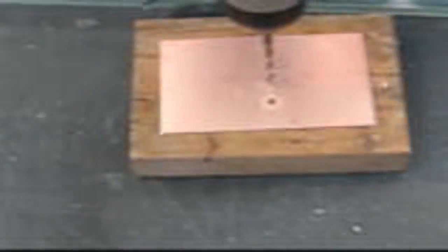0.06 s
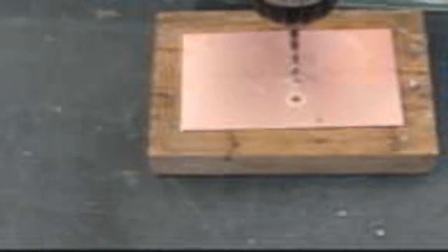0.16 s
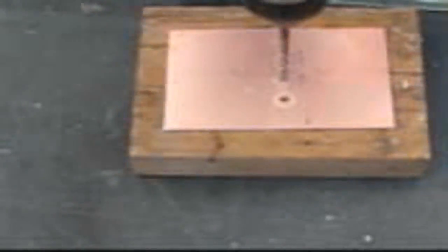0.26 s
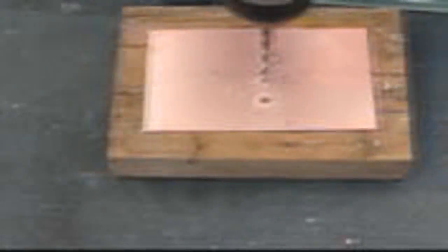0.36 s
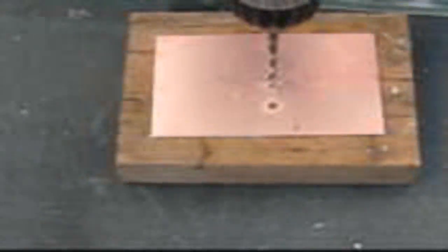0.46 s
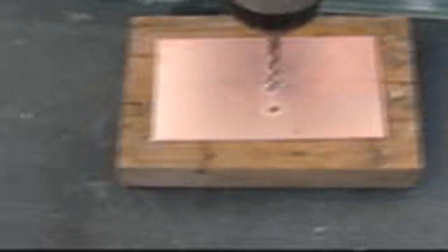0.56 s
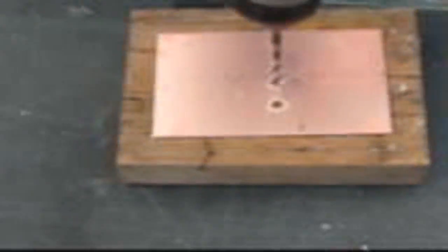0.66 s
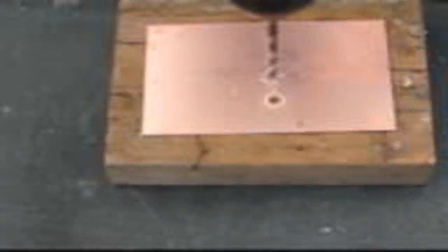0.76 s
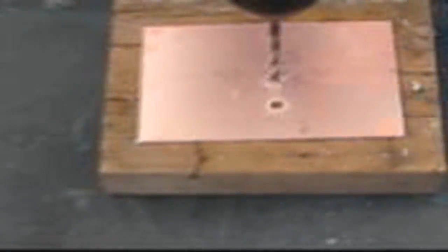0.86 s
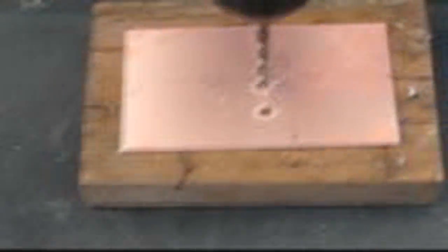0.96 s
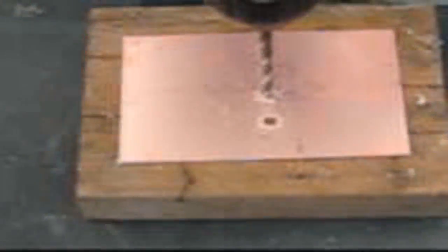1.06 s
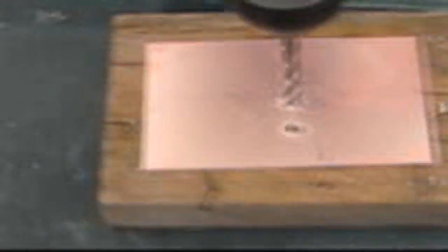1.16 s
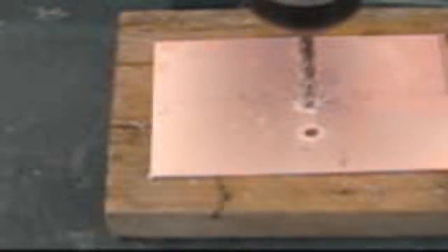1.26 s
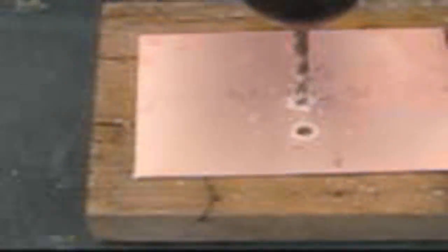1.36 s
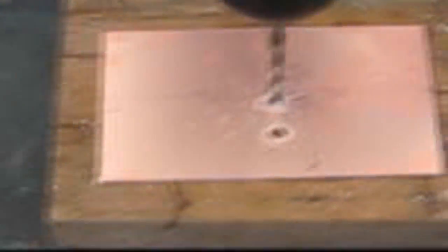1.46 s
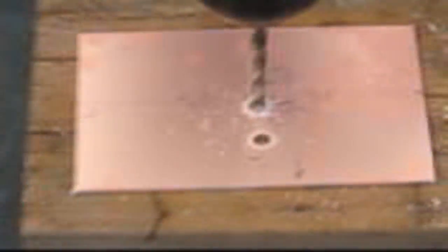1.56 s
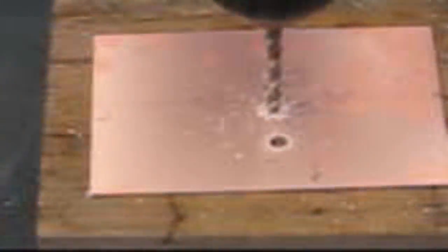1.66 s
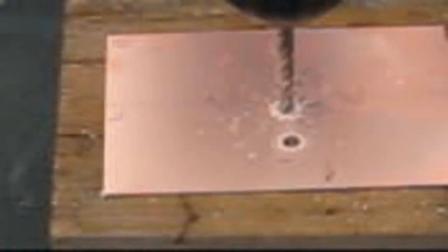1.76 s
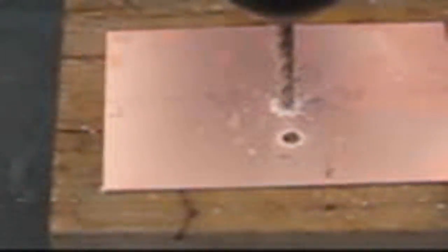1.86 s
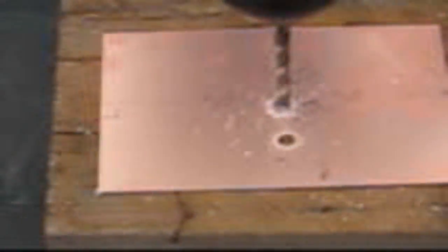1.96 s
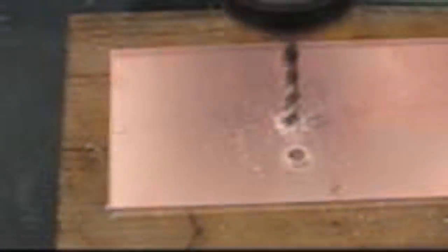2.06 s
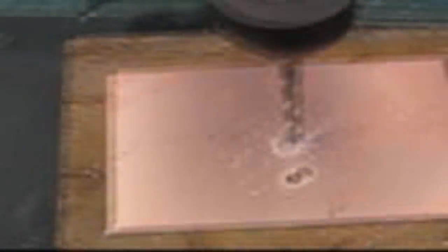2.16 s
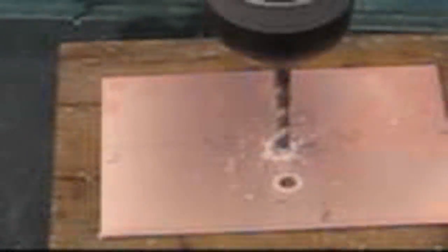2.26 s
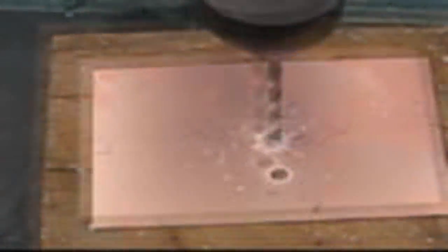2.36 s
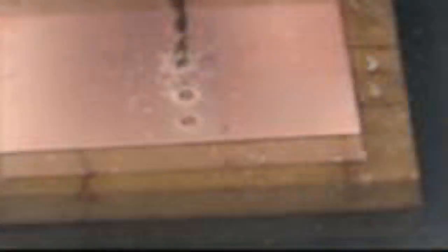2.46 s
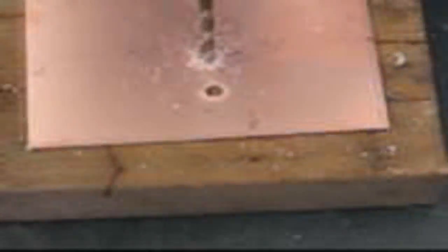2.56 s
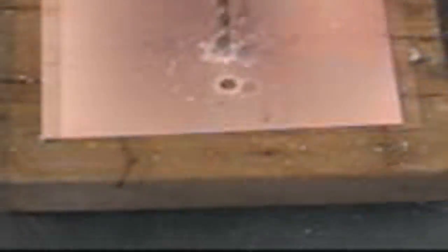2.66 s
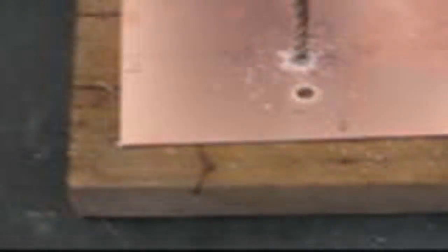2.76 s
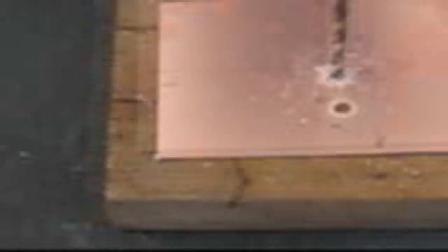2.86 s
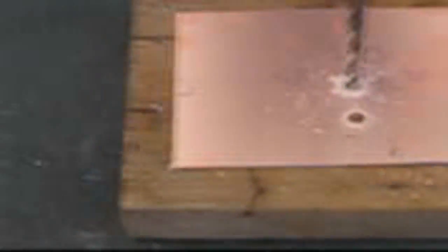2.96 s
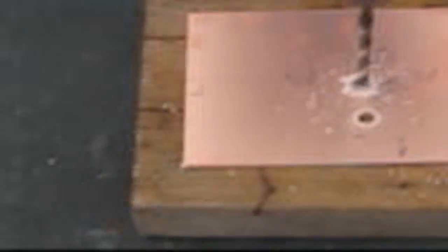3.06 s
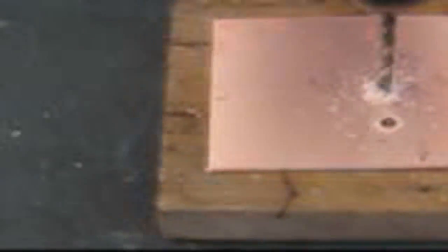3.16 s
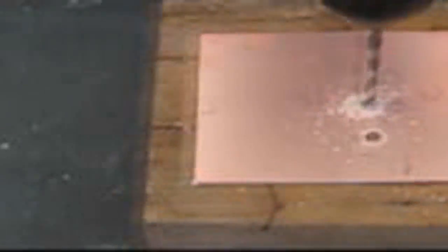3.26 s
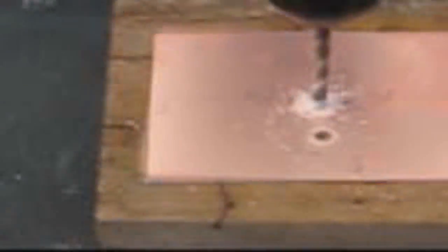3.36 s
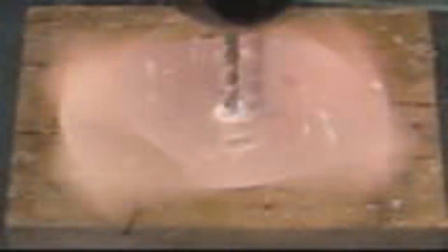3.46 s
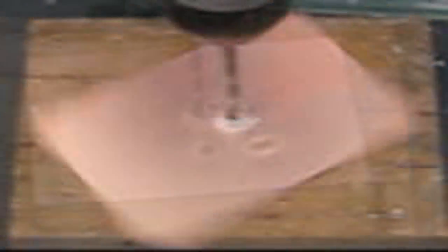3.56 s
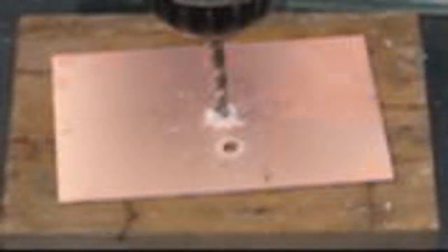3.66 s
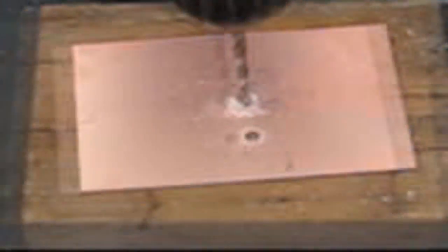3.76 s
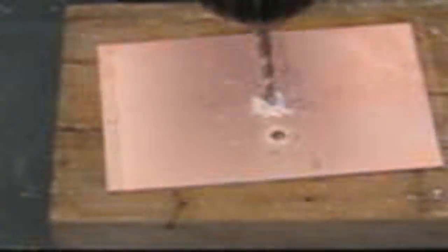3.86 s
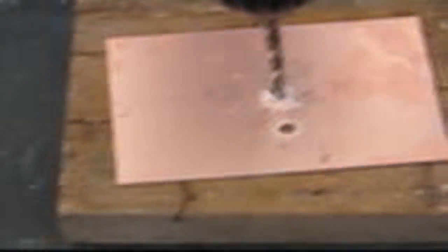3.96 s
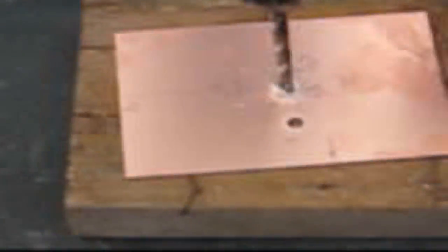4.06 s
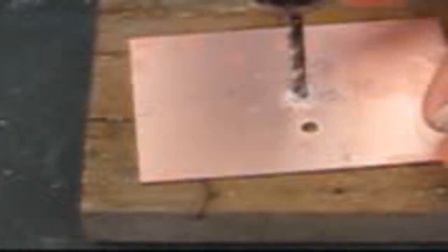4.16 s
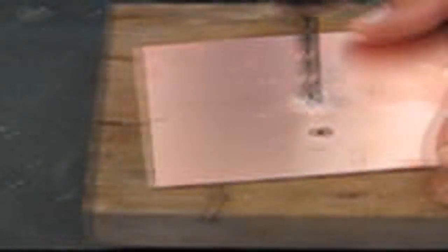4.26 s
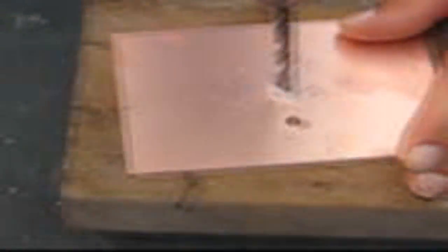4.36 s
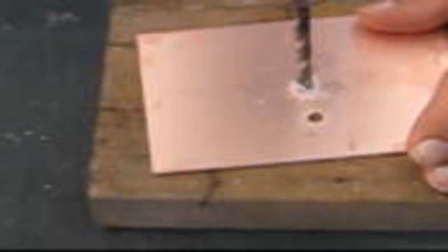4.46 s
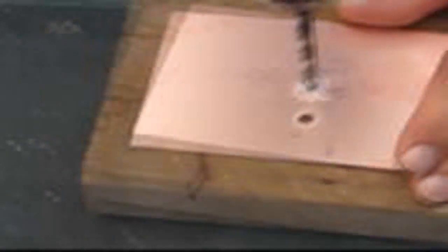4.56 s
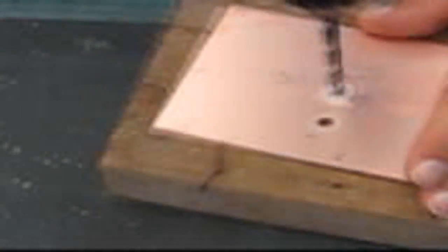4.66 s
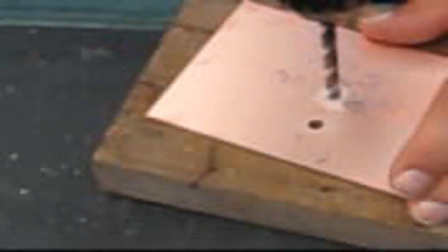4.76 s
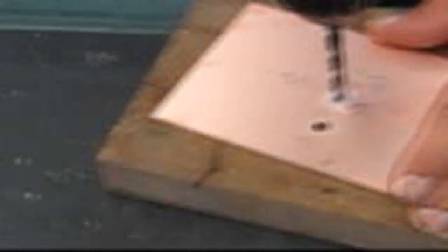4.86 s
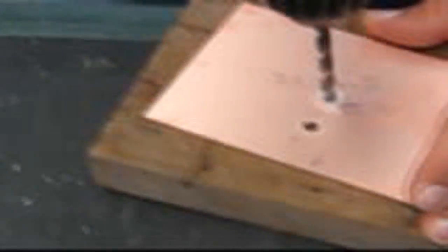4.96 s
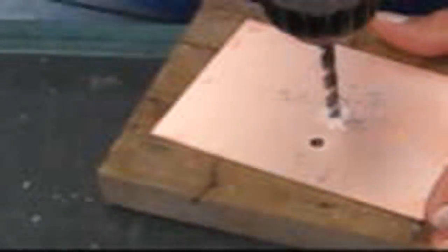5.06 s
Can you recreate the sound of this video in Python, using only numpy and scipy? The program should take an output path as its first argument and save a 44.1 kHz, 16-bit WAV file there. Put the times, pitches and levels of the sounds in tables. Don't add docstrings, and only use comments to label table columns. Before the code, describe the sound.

A handheld electric drill is heard very close, with little room reflection. From 0 to 0.22 seconds it gives a harsh, rattling whirr, then clicks through a short gap. A second burst runs from about 0.33 to 0.57, followed by switch clicks; at 0.67 it restarts with a jolt, and a sharp snap lands at 0.76. The motor then runs almost continuously, its gritty whine swooping down and up until about 1.9, with thin high whistling and brief sheet buzzes. It holds a steadier rough whine until 3.0, then rises in pitch and brightness. Around 3.5 to 3.7 it catches, clatters and winds down, the sheet buzzing briefly until nearly 4.0. Quiet air and faint hum remain. Soft scrapes and ticks follow, with high fingertip squeaks from 4.2 to 4.5. A hard snap at 4.62 accompanies a faint steady electrical whistle until 4.85, while gritty sliding and clicks continue to the end.

```python
import sys
import numpy as np
from scipy import signal
from scipy.fft import rfft, irfft
from scipy.io import wavfile
from scipy.ndimage import uniform_filter1d

SR = 44100
rng = np.random.default_rng(int(sys.argv[2]) if len(sys.argv) > 2 else 0)


def volts_from_db(level):
    exponent = np.asarray(level, float) / 20
    return 10 ** exponent


def dump_mix(stems):
    frames = np.atleast_2d(stems).T
    limited = np.clip(frames, -1, 1)
    pcm = np.round(limited * 32767).astype(np.int16)
    wavfile.write(sys.argv[1], SR, pcm)


N = 225023
TIME = np.arange(N) / SR
TEETH = 10
CRUISE_HZ = 1540


def unit(x):
    return x / np.sqrt(np.mean(x ** 2))


def colour(x, points):
    hz, db = np.transpose(points)
    bins_hz = np.fft.rfftfreq(N, 1 / SR)
    gain_db = np.interp(np.log(bins_hz + 1), np.log(hz), db)
    return irfft(rfft(x) * volts_from_db(gain_db), N)


def band(x, lo_hz, hi_hz):
    return signal.sosfilt(signal.butter(4, [lo_hz, hi_hz], "band", fs=SR, output="sos"), x)


def resonate(x, modes):
    return sum(volts_from_db(db) * signal.lfilter(*signal.iirpeak(hz, hz / width, SR), x) for hz, width, db in modes)


def walk(rate_hz):
    hold = int(SR / rate_hz)
    held = np.repeat(rng.standard_normal(N // hold + 1), hold)
    smooth = uniform_filter1d(uniform_filter1d(held, hold), hold)
    return unit(smooth[:N])


def gate(on, off, ramp):
    return np.clip(np.minimum(TIME - on, off - TIME) / ramp, 0, 1)


def grit(scatter_db):
    size_db = scatter_db * np.minimum(rng.exponential(size=N), 5)
    return unit(rng.standard_normal(N) * volts_from_db(size_db))


def tone(hz, wobble=0):
    return np.sqrt(2) * np.sin(2 * np.pi * hz * TIME + wobble)


def swells(rows, rise_db_s, fall_db_s, rest_db):
    out = np.full(N, 1. * rest_db)
    for on, off, db in rows:
        climb_db = rise_db_s * np.maximum(on - TIME, 0)
        fall_db = fall_db_s * np.maximum(TIME - off, 0)
        out = np.maximum(out, db - climb_db - fall_db)
    return out


def steps(times, values, slew_s):
    index = np.maximum(np.searchsorted(times, TIME) - 1, 0)
    return uniform_filter1d(np.asarray(values, float)[index], int(slew_s * SR))


def motor():
    # start_s, goal_hz (tooth rate the motor heads for), lag_s
    trigger = [(.02, 1390, 0.08), (.22, 0, 0.18), (.344, 1640, 0.083), (.561, 0, 0.1), (.664, 1600, .07),
               (.8, 2000, .14), (1.012, -1500, 0.61), (1.212, 1090, .15), (1.298, 1700.5, 0.18),
               (1.41, 2020, 0.087), (1.617, -1500, .63), (1.765, 499.5, .115), (1.88, 1490.5, 0.112),
               (2.33, 1472, 0.045), (3.03, 2085, 0.118), (3.465, -1, 0.75), (3.665, -1, .2)]
    # start_s, end_s, load_db
    bites = [(.085, .095, 9.5), (.165, .185, 6.5), (.365, .375, 7), (.42, .465, 5), (.54, .57, -2),
             (.75, .78, -1), (.79, .86, -2), (.87, .89, 4), (.89, .93, 2), (.93, 1.03, 6.5),
             (1.03, 1.09, 5), (1.1, 1.125, 4.5), (1.22, 1.3, 9.5), (1.4, 1.425, 5), (1.48, 1.5, 8.5),
             (1.535, 1.555, 3), (1.66, 1.71, 2), (1.71, 1.755, 7), (1.81, 1.84, 3), (1.915, 1.935, 4),
             (2.045, 2.22, 9), (2.22, 2.34, 5), (2.4, 2.55, -1), (2.6, 2.66, 3), (2.9, 3.0, 0.5),
             (3.055, 3.058, 9), (3.085, 3.095, 10), (3.12, 3.13, 7), (3.165, 3.172, 5), (3.3, 3.31, 2.5),
             (3.36, 3.38, 3), (3.42, 3.44, 4), (3.53, 3.54, 8), (3.59, 3.635, 6), (3.67, 3.695, 3.5)]
    # start_s, end_s, load_db
    strains = [(.055, .088, 7), (.135, .17, 3), (.372, .386, 7), (.408, .415, 1), (.703, .722, 7),
               (.73, .755, 1), (.84, .87, -5), (1.165, 1.205, 4), (1.2, 1.33, 4.5), (1.56, 1.645, 7.5),
               (1.71, 1.76, -6), (1.79, 1.85, 7.5), (1.92, 1.965, 8.5), (1.965, 2.02, 3),
               (2.025, 2.08, 7.5), (2.08, 2.17, -2), (2.17, 2.3, -0.5), (2.35, 2.5, -1), (2.5, 3.04, 5.5),
               (3.08, 3.1, 1), (3.13, 3.3, 3), (3.32, 3.45, 4.5), (3.47, 3.54, 6), (3.67, 3.71, 4)]
    start_hz, finger_s = 800, 0.025
    tooth_hz = np.full(N, 1. * start_hz)
    for s, goal_hz, lag_s in trigger:
        i = int(s * SR)
        tooth_hz[i:] = goal_hz + (tooth_hz[i] - goal_hz) * np.exp(-(TIME[i:] - TIME[i]) / lag_s)
    load_db_s, unload_db_s = 550, 500
    bite_db = swells(bites, load_db_s, unload_db_s, -7) + walk(14)
    strain_db = swells(strains, load_db_s, unload_db_s, -9) + walk(14)
    return uniform_filter1d(tooth_hz, int(finger_s * SR)), bite_db, strain_db


def rattle(tooth_hz, turns):
    # start_s, end_s, level_db
    power = [(-.1, 0.22, -21.5), (.23, 0.24, -22.5), (.301, 0.31, -33), (.31, 0.24, -38),
             (.327, 0.57, -21.5), (.566, 0.64, -41), (.629, 0.61, -15), (.64, 0.65, -35.5),
             (.665, 0.77, -21.5), (.76, 0.82, -24.5), (.81, 1.884, -21), (1.9, 3.116, -21),
             (3.1, 3.54, -22), (3.5, 3.57, -20)]
    # start_s, end_s, level_db
    rundown = (3.575, 3.706, -22.5)
    # pitch_hz, width_hz, level_db
    housing = [(1990, 150, -11), (2790, 220, -0.5), (3620, 280, -3), (4320, 230, -1), (4996, 80, 0),
               (7000, 57, -19), (8700, 25.86, -31), (10010, 210, -16.5)]
    # pitch_hz, level_db (per Hz)
    body_colour = [(150, -47), (250, -14.5), (531, -12.5), (773, -14), (957, -18), (1160, -8.5),
                   (2000, -9.5), (2240, -11.5), (2820, -3), (4380, -2.5), (9160, -17.5), (10300, -16),
                   (12500, -23), (16200, -54), (22000, -120)]
    engage_db_s, idle_db = 2500, -44.5
    octaves = np.log2(tooth_hz / CRUISE_HZ)
    powered_db = swells(power, engage_db_s, 902, idle_db)
    dying_db = swells([rundown], engage_db_s, 420, idle_db)
    level_db = np.maximum(powered_db, dying_db) - 0.5 * np.maximum(octaves, -1)
    mids_db = -9 - 1.5 * octaves
    treble_db = -5 + 4 * octaves
    throb = 1 + 0.027 * np.cos(2 * np.pi * turns)
    hits = grit(2.65) * throb * volts_from_db(0.74 * walk(120))
    knocks = sum(resonate((rng.random(N) < 400 / SR) * grit(1.8), [mode]) for mode in housing)
    body = unit(colour(hits, body_colour)) + volts_from_db(-4.5) * unit(knocks)
    parts = ((2816.0, 5800.0, -0.5), (860.0, 2350.0, mids_db), (6200., 15000.0, treble_db),
             (357.0, 803.0, -24.0))
    out = 0
    for lo, hi, db in parts:
        out = out + volts_from_db(db - 2.5 + 0.47 * walk(24.87)) * unit(band(body, lo, hi))
    return out * volts_from_db(level_db) * gate(-1, 3.8, 0.04), level_db


def whine(tooth_hz, turns, bite_db, strain_db):
    multiples = [(.5, -47.5), (2, -28), (2.5, -42.5), (3, -28), (4, -35.5), (5, -35)]
    # pitch_hz, level_db
    radiation = [(300, 7), (480, 1), (700, -10.5), (1900, -12), (2200, -12.5), (2550, -10.5), (2750, -3.5),
                 (3200, -2), (3800, -3.5), (4400, -5), (5200, -3), (6000, -9), (8200, -4.5), (10300, -13),
                 (12000, -30)]
    hz, radiated_db = np.transpose(radiation)
    speed = tooth_hz / CRUISE_HZ
    throb = 1 + 0.19 * np.cos(2 * np.pi * turns)
    out = 0
    for k, db in multiples:
        outlet_db = np.interp(np.log(k * tooth_hz), np.log(hz), radiated_db)
        load_db = bite_db if k == 2 else strain_db
        phase = 2 * np.pi * k * TEETH * turns + .42 * (speed + .2) * walk(100)
        if k == 2:
            roughness = 2.5 * np.clip(speed - 1, 0, .3) + .7 * gate(2.34, 3.5, .03)
            phase = phase + roughness * walk(350)
        waver_db = 1.2 * walk(35) + 1.6 * walk(110)
        out = out + volts_from_db(db + outlet_db + load_db + waver_db) * throb * np.sin(phase)
    return out


def whistle():
    # start_s, end_s, pitch_hz, level_db, octave_db
    switching = [(-.05, 0.03, 3960, -25.5, -35), (0.02, 0.045, 4300, -25, -35),
                 (0.048, 0.166, 4180, -36, -39), (0.3, 0.331, 4350, -41, -35),
                 (0.327, 0.354, 4280, -27, -32), (0.364, 0.514, 3920, -24, -50),
                 (0.627, 0.667, 4350, -47, -34), (0.667, 0.697, 4300, -24, -32),
                 (0.695, .708, 4380, -30, -35), (0.71, 0.798, 4210, -26.5, -50),
                 (0.798, 1, 4270, -29.5, -50), (1.21, 1.288, 4330, -43, -36),
                 (1.288, 1.41, 4320, -30.5, -44), (1.856, 1.919, 4050, -24, -35),
                 (1.915, 2.182, 4317, -28, -40.5), (2.186, 2.5, 4325, -32, -43),
                 (2.5, 3.04, 4325, -31, -43), (4.606, 4.85, 4376, -34.5, -41.5)]
    out = 0
    for on, off, hz, db, octave_db in switching:
        settle_s = .05 * .003 * np.exp(-np.abs(TIME - on) / .003)
        phase = 2 * np.pi * hz * (TIME + settle_s) + .15 * walk(60)
        voice = volts_from_db(db) * np.sin(phase) + volts_from_db(octave_db) * np.sin(2 * phase)
        out = out + gate(on, off, .003) * volts_from_db(1.2 * walk(120)) * np.sqrt(2) * voice
    return out


def chatter():
    # start_s, end_s, pitch_hz, level_db
    grabs = [(1.396, 1.425, 769, -32.5), (1.426, 1.466, 773, -39), (1.754, 1.775, 780, -36),
             (1.778, 1.799, 776, -30), (1.8, 1.822, 772, -37), (1.844, 1.854, 760, -33),
             (1.86, 1.88, 753, -32), (1.886, 1.898, 753, -33), (1.905, 1.918, 753, -33.5),
             (1.945, 1.955, 748, -39), (1.962, 1.972, 750, -35), (1.978, 1.99, 750, -37),
             (2.003, 2.048, 768, -36), (2.058, 2.075, 760, -37), (2.077, 2.114, 758, -39),
             (3.574, 3.617, 750, -44), (3.675, 3.723, 752, -48), (3.724, 3.748, 756, -35.5),
             (3.749, 3.766, 750, -33), (3.766, 3.778, 750, -37.5), (3.783, 3.817, 763, -30.5),
             (3.828, 3.873, 770, -39.5), (3.88, 3.913, 780, -46), (3.933, 3.963, 772, -50)]
    waver = 0.49 * walk(50)
    out = sum(gate(on - .001, off + 0.003, 0.0047) * volts_from_db(db) * tone(hz, waver) for on, off, hz, db in grabs)
    return out * volts_from_db(1.4 * walk(90))


def clicks():
    # start_s, peak level_db, ring pitch_hz, crack share (0 to 1)
    switch = [(.232, -15, 3020, 1), (.269, -19, 4250, 0.59), (.283, -18, 3960, 0.83),
              (.304, -13, 3700, 0.37), (.566, -9.5, 5060, 0.85), (.573, -12.5, 3460, 0.65),
              (.608, -27, 3453, 0.66), (.631, -11.5, 4080, .45), (.634, -18.5, 3600, 0.345),
              (3.701, -26, 3900, 0.31), (3.712, -23, 1240, 0.27), (3.642, -24, 1554, 0.21)]
    catches = [(.026, -4, 3580, 0.41), (.328, -9.5, 3620, 0.27), (.668, -7, 3620, 0.22),
               (1.22, -16, 3645, .1), (1.295, -12, 3620, 0.1), (1.415, -7, 3625, 0.34),
               (1.87, -12, 3470, 0.14), (3.535, -5.5, 3780, 0.36), (3.555, -15, 3020, 0.88),
               (3.5984, -14, 3900, 0.59), (1.247, -17, 3850, .2), (1.744, -12, 1313, 0.61),
               (1.7734, -12, 4350, .4), (1.982, -17, 3467, 0.14), (3.628, -12, 3002, 0.83),
               (3.641, -10, 4300, 0.73), (3.664, -13, 3650, 0.22)]
    snaps = [
        (.351, -5, 3400, 0.6),
        (.7572, -4.5, 2880, 0.74),
        (.7575, -10, 1940, 0.507),
        (4.6243, -7, 4800, 0.6),
    ]
    ticks = [(3.946, -29, 4280, 0.57), (4.249, -24.5, 3000, 0.63), (4.395, -41, 2800, 0.8),
             (4.547, -21, 3280, 0.79), (4.55, -29, 1700, 0.57), (3.8034, -30.5, 2000, 1),
             (3.845, -34, 5000, .9), (4.193, -35, 4500, 0.72), (4.573, -20.5, 6200, 0.87),
             (4.609, -29, 5450, .7), (4.667, -24, 3670, 0.45), (4.711, -16, 2470, 0.51),
             (4.792, -20, 3700, 0.97), (4.824, -30, 7000, 0.9), (4.844, -17, 3630, 0.34),
             (5.043, -26, 5800, 0.3), (4.266, -33, 3384, .6), (4.28, -35, 4300, 0.55),
             (4.529, -29, 4000, 0.8), (4.712, -22, 1470, 0.21), (4.886, -35, 3000, .8),
             (4.92, -36, 3000, .8), (5.046, -35, 1180, 0.094)]
    # clicks, seconds to fade by 60 dB, thud dB
    kinds = [(switch, 0.019, -15), (catches, 0.018, -22.5), (snaps, 0.022, -48), (ticks, 0.024, -21)]
    out, t = np.zeros(N + 4096), np.arange(4096) / SR
    for rows, fade_s, thud_db in kinds:
        for s, db, hz, crack in rows:
            rise_s = 0.00037 + 0.00464 * (1 - np.clip(crack, 0, 1)) ** 2
            attack = np.minimum(t / rise_s, 1) ** 2
            decay = np.exp(-np.log(1000) * np.maximum(t - rise_s, 0) / fade_s)
            ring = (1 - crack) * np.sin(2 * np.pi * hz * t)
            snap = 0.79 * crack * band(rng.standard_normal(4096), 1150.0, 7600.0)
            thud = volts_from_db(thud_db) * np.sin(2 * np.pi * 830 * t)
            start = int((s - 0.6 * rise_s) * SR)
            out[start:start + 4096] += volts_from_db(db) * attack * decay * (ring + snap + thud)
    return out[:N]


def hands():
    # start_s, end_s, scrape level_db, bass_db (relative)
    strokes = [(3.76, 3.858, -48, 5), (3.944, 4.025, -44.5, -9), (4.254, 4.28, -49, -6),
               (4.38, 4.427, -44, -9), (4.43, 4.533, -46, -8), (4.547, 4.553, -40, -20),
               (4.612, 4.618, -35.5, -8), (4.633, 4.681, -32, -8.5), (4.704, 4.716, -29.5, -3),
               (4.742, 4.763, -40, -9), (4.798, 4.835, -34, -13.5), (4.86, 4.914, -48.5, -4),
               (4.993, 5.03, -43.5, -12), (5.033, 5.056, -38, -20), (5.079, 5.2, -35, -15)]
    # pitch_hz, level_db (per Hz)
    scrape_colour = [(150, -35), (250, -4), (749, -6), (839, -11), (1440, -7.5), (2100, -12.5),
                     (4310, -2.5), (12500, -15), (16200, -45), (22000, -120)]
    # start_s, end_s, level_db
    rubs = [
        (4.195, 4.235, -43.5),
        (4.248, 4.285, -41),
        (4.3, 4.395, -40),
        (4.41, 4.435, -51),
        (4.452, 4.53, -44),
    ]
    # pitch_hz, width_hz, level_db
    squeak_modes = [(7200, 400, -5), (7580, 270, 3), (8100, 320, -6), (8180, 220, -3)]
    on, off, db, bass_db = np.transpose(strokes)
    level_db = swells(zip(on, off, db), 701, 350, -53)
    bass_db = steps([0, *(on - .01)], [1, *bass_db], 0.031)
    scrape = colour(grit(3.11) * volts_from_db(2.0 * walk(60)), scrape_colour)
    out = unit(band(scrape, 2130.0, 14000.0))
    out = out + volts_from_db(-6) * unit(band(scrape, 1090.0, 2520.0))
    out = out + volts_from_db(bass_db) * unit(band(scrape, 283.0, 1090.0))
    sheet_mode = [(4300, 270, 0)]
    out = out + volts_from_db(-13.5) * unit(resonate(resonate(scrape, sheet_mode), sheet_mode))
    squeak = unit(resonate(resonate(grit(3.6), squeak_modes), squeak_modes))
    squeak_db = swells(rubs, 550, 300, -90) - 3.0 + 2.5 * walk(90)
    return volts_from_db(level_db) * gate(3.76, 6, 0.015) * out + squeak * volts_from_db(squeak_db)


def bench():
    # start_s, end_s, level_db
    block = [
        (-.1, .01, -35),
        (.12, .13, -34),
        (.205, .235, -32),
        (.36, .38, -38),
        (.565, .58, -32.5),
        (.95, 1., -38.5),
        (1.15, 1.19, -40),
        (1.33, 1.35, -32.5),
        (1.42, 1.5, -44),
    ]
    # start_s, end_s, rumble level_db
    shoves = [(0.288, 0.328, -44), (.66, 0.695, -46.5), (0.838, 1., -48.5), (1.474, 1.544, -45),
              (2.405, 2.98, -46.5), (3.12, 3.29, -44.5), (3.29, 3.445, -41), (3.643, 3.844, -51.5),
              (1.72, 1.779, -44.5), (4.53, 4.722, -44.5), (5.068, 5.2, -42)]
    # pitch_hz, width_hz, level_db
    bench_modes = [(172.5, 33, 0.5), (275, 70, -0.5), (200, 350, -1.5)]
    run_db = -50
    ring = volts_from_db(3.5 * walk(70.3)) * tone(1162, 1.5 * walk(44.63)) * gate(-1, 1.9, .1)
    ring = ring * volts_from_db(swells(block, 450, 550, -58))
    level_db = swells([(-.1, 3.55, run_db), *shoves], 800, 70, -57)
    rumble = volts_from_db(level_db) * unit(resonate(band(rng.standard_normal(N), 111.0, 335.0), bench_modes))
    low_db = -53 + 0.56 * (level_db - run_db) + 2.2 * walk(9)
    low = volts_from_db(low_db) * unit(band(rng.standard_normal(N), 60.0, 174.0))
    deepest = volts_from_db(-70.5 + 2.2 * walk(4.6)) * unit(band(rng.standard_normal(N), 22., 44.0))
    return ring + rumble + low + deepest


def room():
    # pitch_hz, level_db (per Hz)
    air_colour = [(200, -30), (330, -22), (600, -1), (1750, -5), (3000, -7.5), (7000, -14), (12500, -25),
                  (22000, -90)]
    # pitch_hz, level_db
    hum_tones = [(352, -60), (527.8, -53.5)]
    hum = sum(volts_from_db(db + .7 * walk(15)) * tone(hz) for hz, db in hum_tones)
    hum = hum * volts_from_db(-7 * gate(-1, 3.85, .15))
    return volts_from_db(-47) * unit(colour(rng.standard_normal(N), air_colour)) + hum


def scene():
    tooth_hz, bite_db, strain_db = motor()
    turns = np.cumsum(tooth_hz) / SR / TEETH
    gears, gears_db = rattle(tooth_hz, turns)
    running = np.clip(volts_from_db(gears_db + 25), 0, 1) * gate(-1, 3.73, .02)
    drill = gears + running * whine(tooth_hz, turns, bite_db, strain_db) + whistle()
    near = drill + chatter() + clicks() + hands() + bench()
    fade_s = 0.068
    tail = rng.standard_normal(8192) * np.exp(-np.log(1000) * np.arange(8192) / SR / fade_s)
    reflections = volts_from_db(-43.0) * signal.fftconvolve(near, tail)[:N]
    return (near + reflections + room())[None]


def low_pass(x):
    return signal.sosfilt(signal.butter(12, 12760, fs=SR, output="sos"), x)


def record(dry):
    # time_s, edge_hz
    treble_edge = [(0, 12650), (1.5, 12550), (1.9, 12200), (2.6, 12250), (3.1, 11900), (3.7, 11850),
                   (4.2, 12300), (4.6, 12600), (5.1, 12600)]
    rounded = .9 * np.tanh(dry / .9)
    hz, s, spectrum = signal.stft(rounded, SR, nperseg=1024)
    edge_hz = np.interp(s, *np.transpose(treble_edge))
    cut_db = np.clip((hz[:, None] - edge_hz) / 3.4, 0, 70)
    mix = signal.istft(spectrum * volts_from_db(-cut_db), SR)[1][:, :N]
    return low_pass(mix)


dry = scene()
out = record(dry)
dump_mix(out)
```